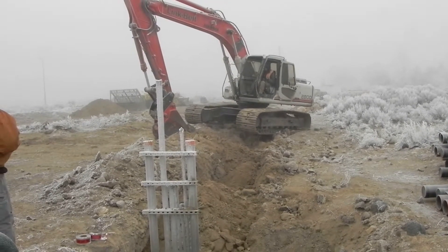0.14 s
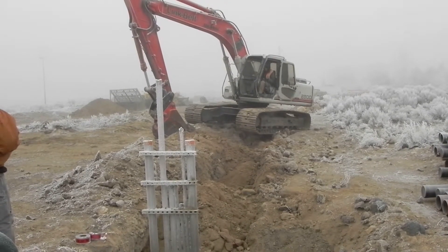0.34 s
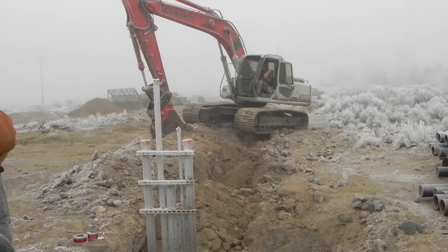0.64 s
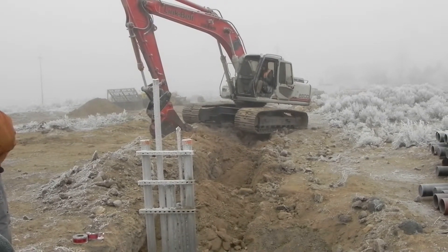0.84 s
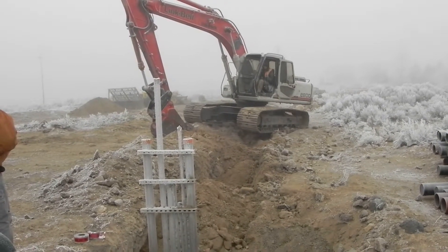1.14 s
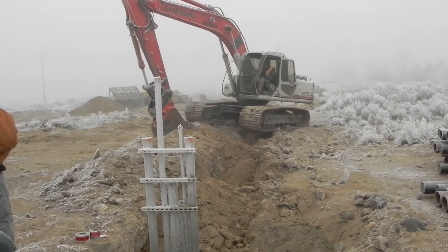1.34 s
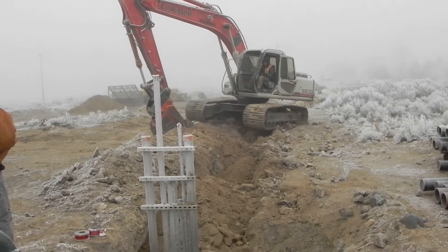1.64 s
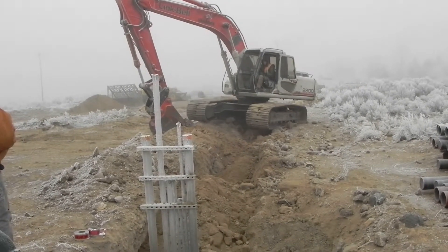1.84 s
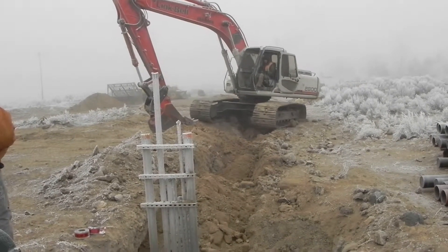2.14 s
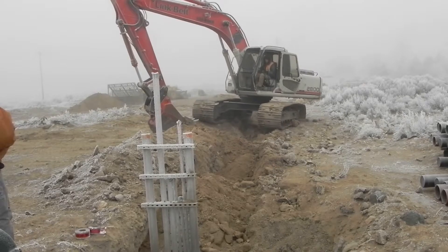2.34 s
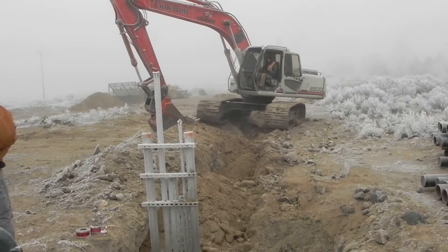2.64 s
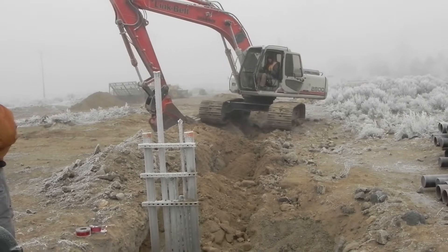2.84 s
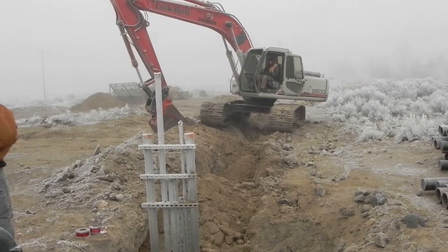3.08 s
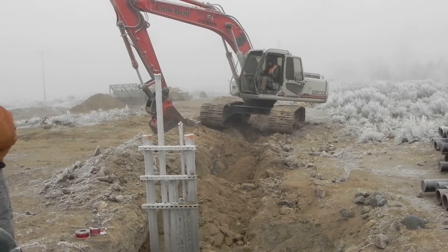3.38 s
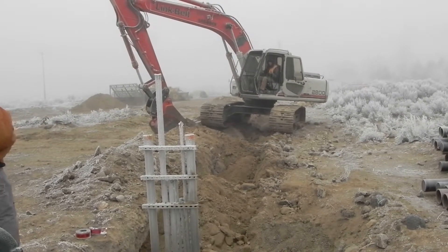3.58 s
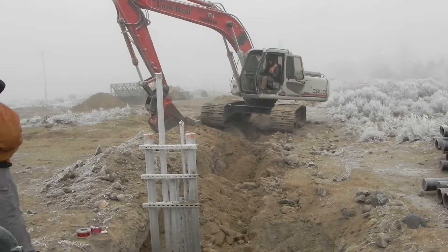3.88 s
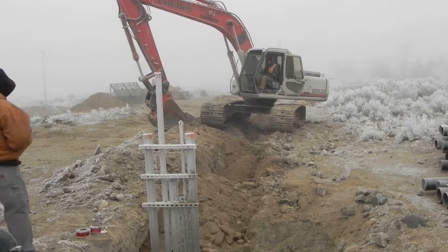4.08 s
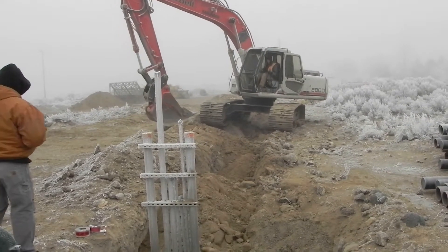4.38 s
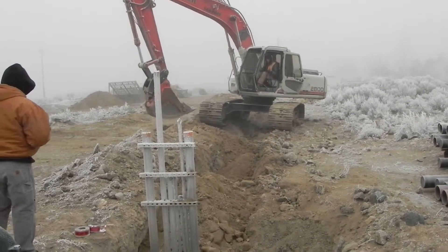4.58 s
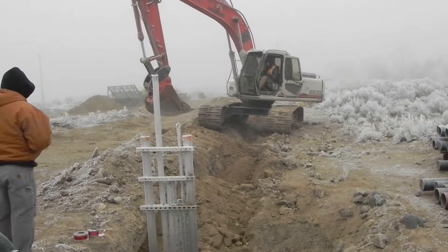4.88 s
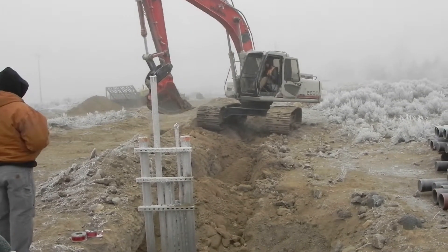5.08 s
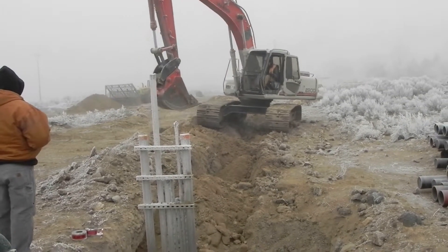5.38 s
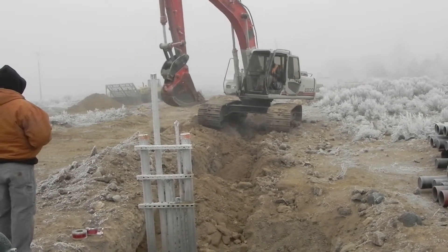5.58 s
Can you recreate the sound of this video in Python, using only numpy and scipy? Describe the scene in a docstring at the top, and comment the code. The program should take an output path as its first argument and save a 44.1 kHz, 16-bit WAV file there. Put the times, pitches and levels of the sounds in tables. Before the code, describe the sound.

A large diesel excavator works outdoors on stony ground, heard in wide stereo from a moderate distance. From 0 to 1.4 s the engine drones evenly, a low buzzing growl with firing clatter, fan rush and soft hull rumble; one faint clank falls near 1.1 s. From about 1.6 s the engine sags slightly and grows louder, a pump whine strengthens, and soil crunch and oil hiss rise. Short, piercing dry-steel squeals chirp until 2.75 s, the longest near 2.5 s, among dull track thuds, clinks and low hull lurches. Between 2.9 and 3.8 s comes a lull: the engine recovers, with only a couple of soft low lurches. From 3.8 s the second push brings a booming hull and heavier clanks, clustered around 4.0, 4.2, 4.55 and 4.75 s, some ringing briefly. Engine speed dips lowest near 4.95 s; sparser knocks follow, with a bright clink at 5.6 s, droning to the end at about 5.7 s.

```python
"""Tracked excavator on stony ground

The diesel drones at a governed speed and sags under hydraulic load: tones locked to the crank, and noise
pulsed by its firings. The hull rumbles, booms and lurches as filtered noise and short low notes.
Creeping tracks clank as noise struck through steel modes, and squeal as wavering stick-slip tones.
Soil crunches and oil hisses as grainy noise; a microphone pair hears it all, with ground scatter."""
import sys
import numpy as np
from scipy import signal
from scipy.fft import rfft, irfft
from scipy.io import wavfile
from scipy.ndimage import uniform_filter1d

SR = 44100
rng = np.random.default_rng(int(sys.argv[2]) if len(sys.argv) > 2 else 0)


def int16_out(signal):
    """Quantize to a 16-bit WAV file."""
    q = np.round(np.clip(np.atleast_2d(signal).T, -1, 1) * 32767)
    wavfile.write(sys.argv[1], SR, q.astype(np.int16))


N = 252252
TIME = np.arange(N) / SR
BINS = np.arange(N // 2 + 1) * SR / N

# Crankshaft speed. Each row: time in seconds, speed in turns per second.
CRANK_SPEED = [(0, 32.9), (1.1, 32.87), (1.4, 32.1), (2.2, 32.3), (2.4, 31.9), (2.7, 32.5), (3, 32.8),
               (3.6, 32.9), (4.3, 32.1), (4.95, 31.55), (5.4, 32)]
GOVERNED_HZ, FULL_SAG_HZ = 32.9, 0.7  # speed running free; sag that counts as full load
# Pitches of the engine, fan and pump tones. Each entry: multiple of the crank speed.
TONE_MULTIPLES = [1.25, 3, 4, 6, 18, 20.6, 22.5, 24, 30]
# Strengths of those tones in the same order. Each row: level in dB running free, level in dB under load.
TONE_LEVELS = [(-48, -47), (-33.5, -30), (-39, -38), (-40, -37), (-55, -37.5), (-47, -54), (-38.3, -46),
               (-48, -48), (-50, -56)]
# Work of the machine, two pushes with a lull between.
# Each row: time in seconds, engine clatter in dB, grit and oil hiss in dB (both before a fixed trim).
WORK = [(0, -33.5, -41.5), (1.1, -33, -42), (1.45, -32.5, -36.5), (1.75, -30.5, -36), (2.6, -30, -38),
        (3.45, -32.5, -40), (3.75, -31, -38), (4.15, -29, -39.5), (4.6, -30, -41), (4.95, -31, -37.5),
        (5.72, -31, -38.5)]
CLATTER_TRIM_DB, GRIT_TRIM_DB = 1.5, -1.5
FIRINGS_PER_TURN = 3
# Low hum geared to the crank. Each row: time in seconds, level in dB, level of its octave in dB.
HUM_LEVELS = [(0, -35.5, -42), (1.2, -35, -41.5), (1.4, -29, -39), (1.75, -34, -48), (2.4, -37.5, -42.5),
              (3, -47, -36.5), (3.8, -51, -38.5), (4.1, -38.5, -42.5), (5.1, -38.5, -42.5),
              (5.4, -31.5, -47), (5.72, -40, -42)]
HUM_MULTIPLE = 7.5  # pitch over crank speed

# Spectrum of the engine's clatter. Each row: frequency in Hz, relative level in dB.
CLATTER_COLOUR = [(250, -6), (330, -5.5), (400, 0), (470, 3.5), (600, 0), (780, -1), (950, -5),
                  (1300, -11.5), (1700, -14), (2200, -29), (3000, -24.5)]
# Spectrum of the shaken hull. Each row: frequency in Hz, relative level in dB.
RUMBLE_COLOUR = [(25, -33.5), (45, -30), (65, -14), (88, -3), (140, -2), (195, -4), (225, -10.5),
                 (270, -13), (330, -28)]
# Hollow boom of the hull when shaken hard. Each row: frequency in Hz, relative level in dB.
BOOM_COLOUR = [(115, -16), (135, -2.5), (155, 17.5), (180, -20.5)]
# Spectrum of crunching soil and hissing oil. Each row: frequency in Hz, relative level in dB.
HISS_COLOUR = [(1500, -4), (2100, 4), (2800, 1.5), (3000, 4.5), (3700, 4.5), (3950, -0.5), (4650, 1.5),
               (5000, -7), (6400, -8), (7000, -20.5), (8600, -27.5), (9300, -38.5), (10500, -58)]
# Spectrum of a struck track shoe. Each row: frequency in Hz, relative level in dB.
SHOE_COLOUR = [(250, -3.5), (400, -2.5), (520, -3.5), (780, -0.5), (1100, -7.5), (1600, 6.5), (2300, 3.5),
               (2900, -3), (3700, -0.5), (5000, -4), (6300, -7.5), (8000, -16.5), (11000, -42)]
# hull rumble: its level at an easy clatter level, and its rise in dB per dB of clatter
EASY_CLATTER_DB, EASY_RUMBLE_DB, RUMBLE_RISE = -33.5, -27, 1.21

# Hull lurches as the tracks take the weight.
# Each row: time of the height in seconds, half length in seconds, pitch in Hz, level in dB at the height.
LURCHES = [(1.691, .03, 149.4, -22), (1.761, .025, 131, -21.5), (1.892, 0.034, 134.2, -14),
           (1.954, .025, 182.8, -21.5), (2.158, 0.04, 145, -20.5), (2.217, .025, 100.1, -20.5),
           (2.413, 0.034, 158.4, -17), (2.654, .03, 96.6, -21), (3.06, 0.071, 150.8, -21.5),
           (3.38, 0.022, 195, -24), (4.128, 0.13, 158.3, -19), (4.208, 0.049, 96, -22.5),
           (4.775, 0.023, 189.8, -21), (4.902, 0.094, 139, -22), (5.678, .011, 104, -19.5)]
LURCH_WOBBLE = 0.5  # radians of phase wander

# Track-shoe blows, from dull thuds to bright steel clinks. Each row: time in seconds, body thud in dB,
# steel ring in dB, bright edge in dB, tilt of the ring in dB per octave, rise in seconds,
# t60 of ring and edge in seconds.
CLANKS = [(1.067, -36, -34.5, -38, -7, .003, 0.11), (1.674, -39, -31, -30.5, -1, .003, 0.087),
          (1.858, -22.5, -29.5, -47, -1, 0.0018, .1), (1.882, -25, -28.5, -50, -5, 0.0016, 0.12),
          (1.945, -35.5, -31.5, -53, -9, .002, 0.11), (1.997, -33.5, -26.5, -25.5, 3, .0033, 0.081),
          (2.116, -22.5, -30.5, -48, -4, 0.0011, .17), (2.228, -37, -31.5, -34.5, 8, 0.001, 0.045),
          (2.358, -21.5, -26, -37, 4, .006, 0.23), (2.383, -29, -25.5, -44, 0.5, .003, 0.15),
          (2.446, -28, -27.5, -36, -1.5, 0.0039, 0.14), (2.603, -20.5, -28.5, -49, -1, 0.0076, 0.23),
          (2.64, -27.5, -31, -49, 1, .003, 0.11), (2.677, -29.5, -29, -44, 1, .007, .12),
          (2.843, -26, -27.5, -36.5, -0.5, 0.00054, .11), (3.81, -36, -30.5, -30, -2, 0.0011, .065),
          (3.999, -20, -27, -39, 3.5, .0008, .12), (4.03, -19.5, -20, -27.5, 2, 0.0038, 0.11),
          (4.103, -31, -33, -46, 5, 0.0014, 0.13), (4.21, -28.5, -27.5, -36, 5, 0.0016, 0.11),
          (4.227, -19, -27.5, -50, -3, 0.0025, 0.15), (4.258, -25, -38, -55, -10, .005, 0.22),
          (4.528, -22, -21.5, -33, 2.5, 0.00065, .11), (4.563, -19, -19.5, -28.5, 5.5, .003, 0.089),
          (4.592, -24.5, -39, -48, 0, 0.0022, 0.085), (4.734, -30, -28, -49, 4, .002, 0.096),
          (4.749, -18.5, -30, -52, 0, .0015, .12), (5.011, -21, -24.5, -43, 0, 0.0019, .14),
          (5.047, -26, -40, -59, 5, 0.0024, 0.21), (5.311, -19.5, -33.5, -57, -4, 0.00036, 0.11),
          (5.519, -25.5, -33, -52, -1, 0.00068, .07), (5.546, -28, -32.5, -40, -4, .002, 0.11),
          (5.599, -29, -22, -22, 2.5, 0.0044, 0.11)]
# Modes of the track frame. Each row: frequency in Hz, width in Hz, relative level in dB.
FRAME_MODES = [(507, 77, 0), (678, 85, -3.5), (1744, 550, -9), (3126, 110, -2), (3390, 220, 1.5),
               (3806, 61, 0), (4520, 120, -2.5), (4700, 58, 3.5), (5530, 61, -3.5), (7050, 60, -1)]
BODY_HOLD = 1.48  # body t60 over steel t60
HALO_DB, HALO_S = -9.5, 0.015  # soft noise around contact, its fade on either side
CRACK_DB, CRACK_S = -13.5, 0.00073  # hard first contact over the blow, its fade
KNOCK_DB, KNOCK_RISE_S = 17.5, 0.002  # impulse for an instant rise; a slower rise weakens it
EDGE_HZ, EDGE_OCTAVES_PER_DB = 13700, 0.1  # edge's top when level with the ring; drops as it weakens
SCATTERED_CLANK_DB = -8  # clanks that come back off the stony ground from all round

# Shoes and pins left ringing by the hardest blows. Each row: time in seconds, pitch in Hz, level in dB.
RINGS = [(4.0, 3640, -32.5), (4.034, 5620, -36), (4.212, 3560, -27.5), (4.531, 3930, -32),
         (4.565, 4560, -25), (4.567, 5150, -30.5), (4.735, 5130, -43), (5.013, 3680, -35),
         (5.604, 4360, -26.5)]
RING_T60_S, RING_SPLIT_HZ = 0.11, 33

# Dry steel squeals and groans. Each row: start in seconds, length in seconds, pitch in Hz, level in dB,
# roughness from 0 to 1, rise in seconds, left minus right in dB.
SQUEALS = [(1.616, .034, 4700, -28.5, .25, .005, -2), (1.626, .031, 3600, -22.5, .32, .004, -13),
           (1.668, .026, 3710, -24.5, .55, .002, -9), (1.64, .048, 7390, -39, .5, .018, -1),
           (1.703, .04, 3745, -34, .6, .003, -6), (1.785, .028, 3720, -40, .7, .004, -6),
           (1.705, .045, 7420, -46, .4, .015, -1), (1.76, .05, 1545, -36.5, .8, .01, 0),
           (1.905, .045, 7550, -53, .4, .012, 0), (1.93, .07, 700, -31, .2, .008, 0),
           (1.998, .025, 9550, -54, .8, .004, 0), (2.005, .09, 7140, -41, .45, .015, 7),
           (2.015, .03, 5460, -36, .5, .005, -2), (2.053, .055, 5345, -19, .45, .0006, -3),
           (2.1, .07, 7130, -36, .65, .012, -6), (2.112, .017, 5400, -28, .6, .004, -3),
           (2.175, .048, 7270, -33, .33, .018, -6), (2.315, .016, 5290, -37, .5, .006, -1),
           (2.33, .028, 5240, -29.5, .45, .004, -1), (2.455, .045, 7740, -42, .55, .014, 0),
           (2.508, .107, 5300, -22.3, .48, .005, -2), (2.657, .027, 5320, -23.5, .65, .004, -3),
           (2.686, .036, 5270, -20.5, .36, .003, -3), (2.72, .025, 5370, -17.5, .42, .003, -3)]
SQUEAL_SAG = 0.0091  # share by which the pitch dips midway, while the grip is firmest
SLIP_RISE, SLIP_S = 0.0054, 0.011  # share of the pitch flick as the grip lets go, its half length
RASP, RASP_HZ = 0.71, 993  # flutter depth of a fully rough squeal, flutter rate
OCTAVE_DB, SQUEAL_LEAD = -51.5, 1  # faint second harmonic; radians of lead at the right port

# Likeness of the two ports. Each row: frequency in Hz, direct share from 0 to 1.
DIRECT_SHARE = [(500, 0.8), (1000, 0.4), (2000, 0.6), (4000, 0.7)]
# Width of the microphone pair. Each row: frequency in Hz, side minus mid in dB.
STEREO_WIDTH = [(40, -19.5), (90, -13.5), (180, -36.5), (310, -1), (520, 0), (900, 3.5), (1550, 3.5),
                (2670, 3), (4590, -3), (7900, 2)]
# Balance of the microphone pair. Each row: frequency in Hz, left minus right in dB.
STEREO_LEAN = [(60, -0.5), (300, 2.5), (520, -0.5), (1550, -2), (4590, -3), (7900, 5)]
PORT_LAG_S, SCATTER_S = 0.00025, 0.018  # sets the phase lag; fade of the ground echoes
TOP_HZ = 11200


def undb(db):
    """Decibel law: twenty decibels to each tenfold amplitude."""
    return 10 ** (np.asarray(db) / 20)


def unit(x):
    """Normalization: scale to rms 1."""
    return x / np.sqrt(np.mean(x ** 2))


def curves(table):
    """Linear interpolation: each column of a timed table, sample by sample."""
    s, *columns = np.transpose(table)
    return [np.interp(TIME, s, c) for c in columns]


def across(points, hz=BINS):
    """Logarithmic pitch scale: read (Hz, value) points on a log-frequency axis."""
    f, value = np.transpose(points)
    return np.interp(np.log(hz + 1), np.log(f), value)


def colour(x, db):
    """Minimum-phase filtering: fold the cepstrum of a dB spectrum to make the response causal."""
    cepstrum = irfft(np.log(undb(db)), N)
    cepstrum[1:N // 2] *= 2
    cepstrum[N // 2 + 1:] = 0
    return irfft(rfft(x) * np.exp(rfft(cepstrum)), N)


def skirts(points):
    """Band limitation: a dB spectrum falls 30 dB per octave beyond its ends, by 60 dB at most."""
    outside = np.log2(np.clip(BINS + 1, points[0][0], points[-1][0]) / (BINS + 1))
    return across(points) - np.minimum(30 * np.abs(outside), 60)


def walk(rate, size=N):
    """Band-limited modulation: a smooth random wander of rms 1."""
    place = np.arange(size) * 6 * rate / SR
    draws = rng.standard_normal(int(place[-1]) + 12)
    knots = np.convolve(draws, np.hanning(11), "valid")
    return unit(np.interp(place, np.arange(len(knots)), knots))


def grains(spread_db):
    """Granular noise: dense tiny impacts of unequal size."""
    return unit(rng.standard_normal(N) * undb(spread_db * walk(980)))


def steady(x, size=4000):
    """Inertial averaging: even out the level over a sliding window of samples."""
    return x / np.sqrt(uniform_filter1d(x ** 2, size=size))


def engine(crank_hz, turns):
    """Order-locked tones: multiples of crank speed, rebalanced as load pulls the speed down."""
    load = np.clip((GOVERNED_HZ - crank_hz) / FULL_SAG_HZ, 0, 1)
    out = 0
    for multiple, (free_db, load_db) in zip(TONE_MULTIPLES, TONE_LEVELS):
        phase = 2 * np.pi * (multiple * turns + rng.random()) + .1 * walk(5)
        waver_db = .8 * walk(4)
        level_db = free_db + load * (load_db - free_db) + waver_db
        out = out + np.sqrt(2) * np.sin(phase) * undb(level_db)
    return out


def clatter(turns, level_db):
    """Combustion knock: each firing pulses grainy noise, over the steady rush of the fan."""
    since_firing = turns * FIRINGS_PER_TURN % 1
    knock = 1 + .5 * np.exp(-since_firing / 0.2)
    flutter_db = .5 * walk(12)
    noise = unit(colour(grains(0.45) * knock, skirts(CLATTER_COLOUR)))
    return noise * undb(level_db + CLATTER_TRIM_DB + flutter_db)


def hum(turns):
    """Harmonic exchange: a geared tone swells at times and nearly vanishes in the lull for its octave."""
    level_db, octave_db = curves(HUM_LEVELS)
    phase = 2 * np.pi * HUM_MULTIPLE * turns + .1 * walk(5)
    return np.sqrt(2) * (np.sin(phase) * undb(level_db) + np.sin(2 * phase) * undb(octave_db))


def effort_shake(clatter_db):
    """Forced vibration: the level of the hull's shaking grows with the engine's effort."""
    return EASY_RUMBLE_DB + RUMBLE_RISE * (clatter_db - EASY_CLATTER_DB)


def rumble(turns, level_db):
    """Forced resonance: uneven firings and grinding tracks shake the hull, and hard shaking booms."""
    fired = np.diff(np.floor(turns * FIRINGS_PER_TURN), prepend=0)
    firings = unit(fired * (1 + 1.2 * rng.standard_normal(N)))
    drive = 0.21 * firings + rng.standard_normal(N)
    # a heavy body averages its drive over several firings
    hull = steady(colour(drive, skirts(RUMBLE_COLOUR)))
    boom = steady(colour(rng.standard_normal(N), skirts(BOOM_COLOUR)))
    # the harder the shaking, the more of its power goes into the boom
    boom_share = np.clip((level_db + 23.5) / 11, 0, .8)
    return (hull * np.sqrt(1 - boom_share) + boom * np.sqrt(boom_share)) * undb(level_db)


def lurches():
    """Transient hull resonance: each lurch swells and dies on one low, unsteady note."""
    out = 0
    for s, half, pitch_hz, db in LURCHES:
        swell = undb(db) * np.exp(-((TIME - s) / half) ** 2)
        phase = 2 * np.pi * pitch_hz * TIME + LURCH_WOBBLE * walk(25)
        out = out + np.sqrt(2) * swell * np.sin(phase)
    return out


def clanks(size=16384):
    """Modal impact: steel chatters and rings a random mix of frame modes; the body holds longest."""
    hz = np.arange(size // 2 + 1) * SR / size
    lead = SR // 20  # room for the soft noise before contact
    age = (np.arange(size) - lead) / SR
    modes = np.array([undb(db) / (1 + 2j * (hz - mode_hz) / width) for mode_hz, width, db in FRAME_MODES])
    halo = undb(HALO_DB) * np.exp(-np.abs(age) / HALO_S)
    crack = 1 + undb(CRACK_DB) * np.exp(-np.abs(age) / CRACK_S)
    out = np.zeros(N + size)
    for s, thud_db, ring_db, edge_db, tilt_db, rise, t60 in CLANKS:
        start = int(s * SR) - lead
        attack = 1 - np.exp(-np.maximum(age, 0) / rise)
        signs = rng.choice([-1, 1], len(FRAME_MODES))
        struck = 2.4 * signs * rng.uniform(.4, 1.2, len(FRAME_MODES))
        response = undb(across(SHOE_COLOUR, hz)) * (1 + struck @ modes)
        knock = (age == 0) * undb(KNOCK_DB) * np.exp(-rise / KNOCK_RISE_S)
        top_hz = EDGE_HZ * 2 ** (EDGE_OCTAVES_PER_DB * (edge_db - ring_db))
        # body, ring and edge: low Hz, high Hz, dB, dB per octave, t60 in s
        registers = [(298, 1047, thud_db, 0, BODY_HOLD * t60),
                     (1150, 4880, ring_db, tilt_db, t60),
                     (4450, top_hz, edge_db, 0, t60)]
        for low_hz, high_hz, gain_db, slope_db, decay in registers:
            blow = attack * np.exp(-np.log(1000) * np.abs(age) / decay) * crack
            # a rapid string of small contacts, uneven in size
            contacts = rng.standard_normal(size) * undb(2.0 * walk(400.0, size=size))
            chatter = steady(contacts, size=600)
            edges = np.sqrt(1 + (low_hz / (hz + 30)) ** 10 + (hz / high_hz) ** 10)
            band = response * undb(slope_db * np.log2(hz + 1)) / edges
            band /= np.sqrt(np.mean(np.abs(band) ** 2))
            force = knock + chatter * (halo + blow)
            out[start:start + size] += undb(gain_db) * irfft(rfft(force) * band)
    return out[:N]


def rings():
    """Beating of near-degenerate modes: a struck shoe or pin rings as a close pair of tones."""
    out = np.zeros(N + SR)
    age = TIME[:SR // 4]
    decay = np.exp(-np.log(1000) * age / RING_T60_S)
    for s, pitch_hz, db in RINGS:
        start = int(s * SR)
        main = np.sin(2 * np.pi * pitch_hz * age)
        partner = .5 * np.sin(2 * np.pi * (pitch_hz + RING_SPLIT_HZ) * age)
        out[start:start + len(age)] += undb(db) * (main + partner) * decay
    return out[:N]


def squeals():
    """Stick-slip friction: a steel mode swells, wavers, lets go and rings out; a slow rise leaves softly."""
    out = np.zeros((2, N))
    age = TIME[:SR // 4]
    size = len(age)
    for s, length, pitch_hz, db, rough, rise, pan_db in SQUEALS:
        start = int(s * SR)
        sag = SQUEAL_SAG * (np.sin(np.pi * np.minimum(age / length, 1)) - .5)
        slip = SLIP_RISE * np.exp(-((age - length) / SLIP_S) ** 2)
        hz = pitch_hz * (1 - sag + slip + .011 * rough * walk(200, size=size))
        phase = 2 * np.pi * np.cumsum(hz) / SR
        after = np.maximum(age - length, 0)
        release = .86 * np.exp(-after / (.001 + .6 * rise))
        ring_out = .14 * np.exp(-after * pitch_hz / 160)
        grip = (1 - np.exp(-age / rise)) * (release + ring_out)
        swing = grip * undb(db + 4 * rough * walk(130, size=size))
        octave = undb(OCTAVE_DB) * np.sin(2 * phase)
        sides = undb([pan_db / 2, -pan_db / 2])
        for port, gain in enumerate(unit(sides)):
            # a fast random flutter roughens the tone
            flutter = walk(RASP_HZ, size=size) + 1j * walk(RASP_HZ, size=size)
            carrier = np.exp(1j * (phase + port * SQUEAL_LEAD))
            tone = np.imag((1 + RASP * rough * flutter) * carrier) + octave
            out[port, start:start + size] += np.sqrt(2) * gain * swing * tone
    return out


def grit(level_db):
    """Granular friction: soil crunches under the shoes, with the hiss of oil in the valves."""
    crunch = unit(grains(0.68) * undb(1.0 * walk(90)))
    flutter_db = .6 * walk(20)
    return unit(colour(crunch, skirts(HISS_COLOUR))) * undb(level_db + GRIT_TRIM_DB + flutter_db)


def ports(x, diffuse):
    """Interaural phase and scattering: the machine stands to the right, the diffuse sound all round."""
    # the left port lags below 2 kHz; above, the sign of the phase difference alternates
    phase_side = np.tanh(4 * np.sin(2 * np.pi * BINS * PORT_LAG_S))
    lagging = np.clip(across(DIRECT_SHARE), 0, .95) * phase_side
    echoes = rng.standard_normal(N) * np.exp(-TIME / SCATTER_S)
    scatter = .6 * rfft(echoes) / np.sqrt(np.sum(echoes ** 2))
    mid = rfft(x)
    around = np.sqrt(1 - lagging ** 2) * (mid * scatter + rfft(diffuse))
    side = undb(across(STEREO_WIDTH)) * (around - 1j * lagging * mid)
    lean = undb(across(STEREO_LEAN) / 2)
    return irfft(np.array([(mid + side) * lean, (mid - side) / lean]), N)


def scene():
    """Superposition: machine and tracks, with a diffuse copy of clatter, grit and clanks; squeals join last."""
    crank_hz, = curves(CRANK_SPEED)
    clatter_db, grit_db = curves(WORK)
    turns = np.cumsum(crank_hz) / SR
    machine = engine(crank_hz, turns) + clatter(turns, clatter_db) + hum(turns)
    hull = rumble(turns, effort_shake(clatter_db)) + lurches()
    tracks = clanks() + rings() + grit(grit_db)
    # fresh random draws, so the diffuse sound is unlike the direct
    diffuse = clatter(turns, clatter_db) + grit(grit_db) + undb(SCATTERED_CLANK_DB) * clanks()
    return ports(machine + hull + tracks, diffuse) + squeals()


def record(dry):
    """Low-pass filtering: a steep elliptic filter cuts the extreme treble."""
    return signal.sosfilt(signal.ellip(8, .2, 80, TOP_HZ, fs=SR, output="sos"), dry)


dry = scene()
out = record(dry)
int16_out(out)
```